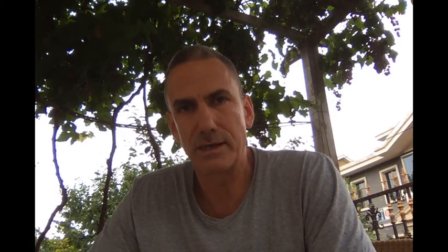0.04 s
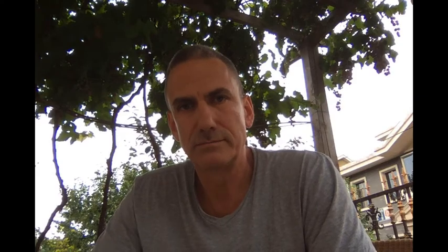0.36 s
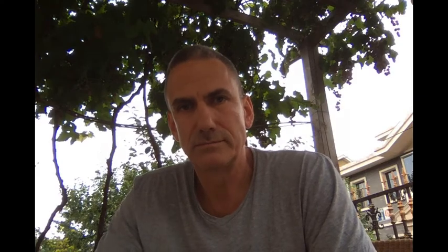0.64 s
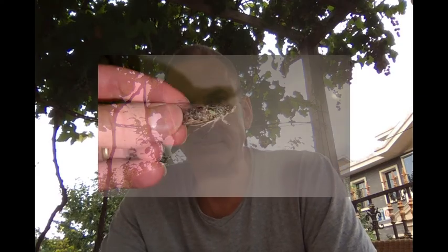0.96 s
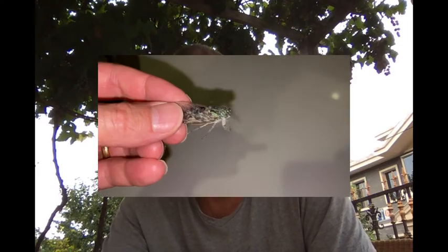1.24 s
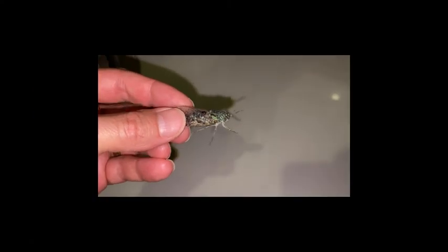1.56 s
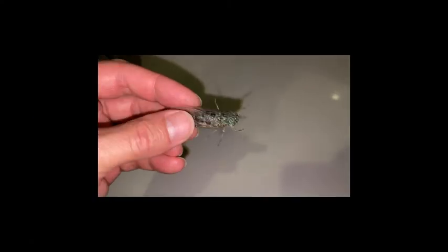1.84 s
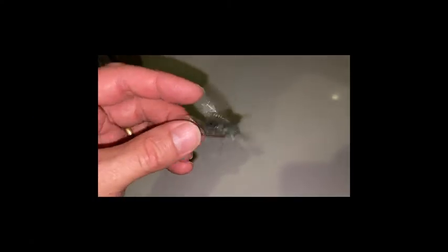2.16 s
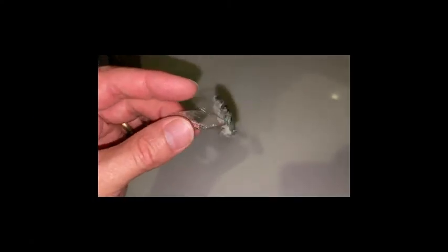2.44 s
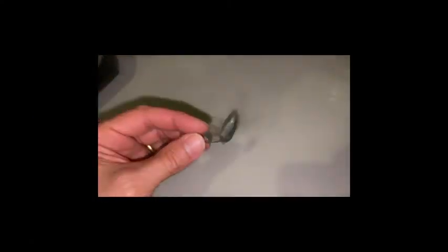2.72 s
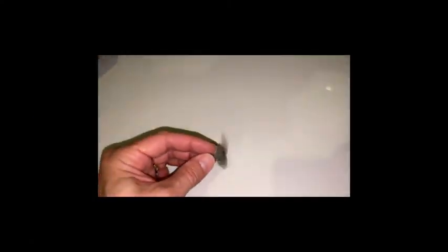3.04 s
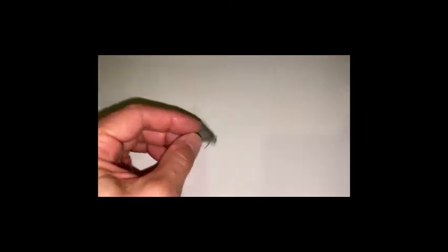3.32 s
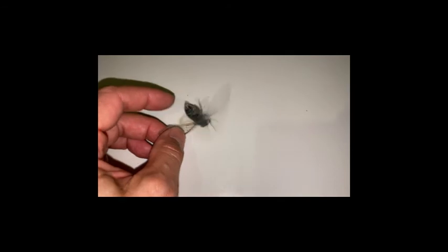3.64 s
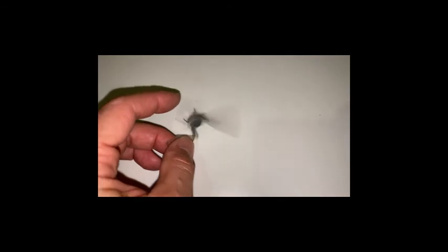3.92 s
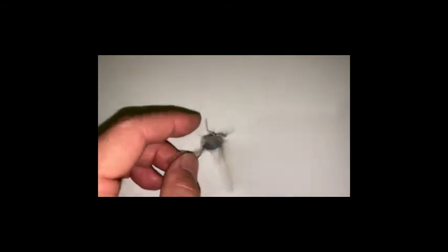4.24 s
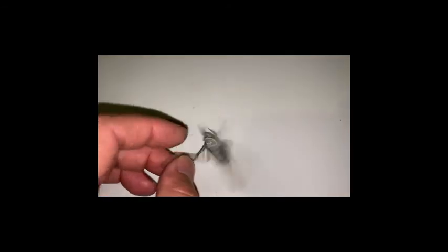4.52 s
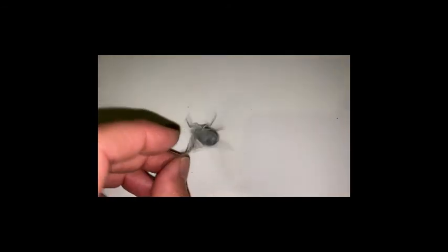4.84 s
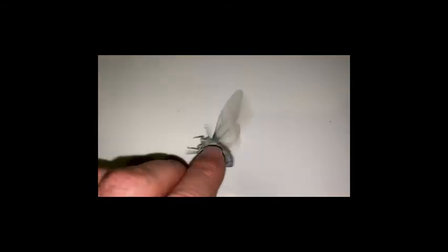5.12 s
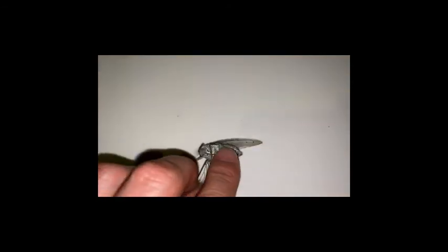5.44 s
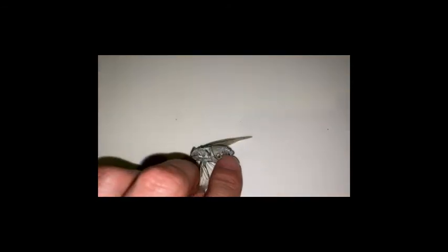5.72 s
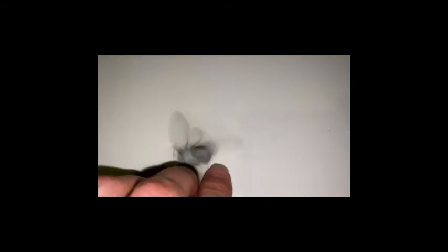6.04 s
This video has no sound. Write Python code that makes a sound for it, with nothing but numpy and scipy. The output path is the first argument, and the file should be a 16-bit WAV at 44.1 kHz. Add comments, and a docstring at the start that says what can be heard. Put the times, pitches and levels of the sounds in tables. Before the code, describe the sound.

A hand-held cicada buzzes in harsh, stuttering bursts with papery wing flicks, close up in a small room after a brief outdoor rumble.

```python
"""A cicada held between the fingers protests in harsh bursts, close up in a small, hard room.
Each pull of a tymbal buckles a row of ribs: they click, the thin membrane sizzles and the hollow
abdomen rings with a falling tone. The voice shifts as the insect is squeezed or twists away.
Wings and legs tick against the fingers, and the hands bump softly. Underneath, a low outdoor
rumble gives way to the room's air and hum after the first second."""
import sys
import numpy as np
from scipy import signal
from scipy.fft import rfft, irfft
from scipy.io import wavfile
from scipy.ndimage import uniform_filter1d

SR = 44100
rng = np.random.default_rng(int(sys.argv[2]) if len(sys.argv) > 2 else 0)


def int16_out(signal):
    """Quantize to a 16-bit WAV file."""
    q = np.round(np.clip(np.atleast_2d(signal).T, -1, 1) * 32767)
    wavfile.write(sys.argv[1], SR, q.astype(np.int16))


N = 267775
TIME = np.arange(N) / SR
PULSE_SIZE = 1024  # samples in one short sound
PULSE_TIME = np.arange(PULSE_SIZE) / SR


# The cicada's phrasing. Each row: first and last pull in seconds, pull period in ms, then the
# levels in dB at full effort of abdomen tone, rib clicks and membrane sizzle.
BURSTS = [(.952, 1.027, 8.7, -26, -22.5, -19.5), (1.043, 1.043, 8.5, -24.5, -25.5, -24),
          (1.416, 1.416, 8.5, -26, -21.5, -24.5), (1.649, 1.649, 8.5, -26, -21, -21.5),
          (1.994, 2.017, 12, -27.5, -21, -24), (2.265, 2.350, 8.55, -28.5, -21.5, -25.5),
          (2.369, 2.369, 8.5, -31, -22, -33), (2.408, 2.525, 8.65, -30.5, -21.5, -28),
          (2.550, 2.629, 7.9, -34.5, -21, -28.5), (2.642, 2.762, 8.7, -33, -22, -29.5),
          (2.769, 2.927, 7.9, -33.5, -25, -28.5), (2.935, 3.011, 7.7, -32.5, -22, -25.5),
          (3.048, 3.089, 7.8, -31, -22.5, -26.5), (3.118, 3.136, 7.5, -29.5, -22.5, -34),
          (3.512, 3.523, 11, -30, -23, -34), (3.588, 3.681, 8.3, -29, -20.5, -27.5),
          (3.840, 3.850, 10, -27.5, -21.5, -29.5), (3.987, 4.039, 8.8, -25.5, -20, -25.5),
          (4.211, 4.224, 13, -25, -18.5, -25), (4.297, 4.385, 8.5, -25.5, -19.5, -24.5),
          (4.455, 4.463, 8, -26, -19, -25), (4.641, 4.655, 14, -25.5, -21, -33.5),
          (4.9305, 4.9305, 8.5, -23.5, -17.5, -29.5), (5.038, 5.058, 9, -22.5, -16.5, -24.5),
          (5.231, 5.326, 8.6, -25, -24, -25.5), (5.335, 5.426, 9.15, -23.5, -21, -24.5),
          (5.438, 5.450, 12, -23, -18.5, -25), (5.618, 5.648, 9, -25, -22.5, -24),
          (5.662, 5.760, 7.9, -24, -20.5, -23), (5.807, 5.825, 9, -25.5, -22, -20),
          (5.887, 5.908, 8, -27.5, -22.5, -21)]

def pulls():
    """The muscles fire evenly through a burst, the last pull off the beat: times and three levels."""
    rows = []
    for first, last, period_ms, *levels in BURSTS:
        period = period_ms / 1000
        steady = np.arange(first, last - .75 * period, period)
        rows += [(s, *levels) for s in (*steady, last)]
    return np.transpose(rows)


# The body's EQ: one this small hardly radiates bass. Each row: frequency in Hz, gain in dB.
RADIATION = [(100, -33), (500, -9.5), (800, -7), (1000, 2), (1170, 11), (1350, 0), (1700, -2), (2200, 7),
             (2700, -1), (16000, -1)]

def tymbals(jitter_s=.0003, lead_s=.006, stroke_s=.0026, cup_s=2.66, cup_length_s=.055):
    """One pulse per pull: the ribs buckle in turn, ever more slowly, one to each swing of the abdomen."""
    times, tone_db, rib_db, sizzle_db = pulls()
    count = len(times)
    fresh, slack = effort(times)
    turn, (tone_hz, fall, rib_hz, sizzle_hz, sizzle_ms) = grip(times)
    cup = bell(times, cup_s, cup_length_s)  # a finger cups the abdomen and muffles its tone
    alternate_db = (-1) ** np.arange(count)  # the two tymbals take turns and are not quite alike
    # A run starts duller and a little sharp, and ends weaker and flat.
    tone_hz = tone_hz + 35 * fresh - 45.2 * slack
    tone_db = tone_db - 2.5 * slack - 6.5 * cup + alternate_db + scatter(1.6, count)
    rib_db = rib_db - 3.5 * fresh - 2.5 * slack - 7 * turn + scatter(1.6, count)
    sizzle_db = sizzle_db - 4.5 * fresh - 2.5 * slack + 2.2 * turn - alternate_db + scatter(2, count)

    # The stroke runs from -1 to 1 while the tymbal caves in.
    stroke = (PULSE_TIME - lead_s) / (stroke_s * np.exp(scatter(.1, count)))[:, None]
    force = np.clip(1 - stroke ** 2, 0, 1)
    swing, cycles = abdomen(stroke, tone_hz, fall)
    buckles = np.diff(np.floor(cycles), prepend=0, axis=1) * force * undb(scatter(3, force.shape))
    clicks = ribs(buckles, times, rib_hz, sizzle_ms / 1000, cup)
    sizzle = membrane(buckles, sizzle_hz, sizzle_ms / 1000, turn)
    pulses = at_level(np.sqrt(force) * swing, tone_db)
    pulses = pulses + at_level(clicks, rib_db) + at_level(sizzle, sizzle_db)
    return colour(place(times + scatter(jitter_s, count) - lead_s, pulses), RADIATION)


def effort(times, pause_s=.022, attack_s=.035, release_s=.022):
    """Effort builds through a run of pulls and slackens at its end: freshness and slack, both 0-1."""
    runs = np.split(times, np.flatnonzero(np.diff(times) > pause_s) + 1)
    fresh = np.concatenate([np.exp((run[0] - run) / attack_s) for run in runs])
    ending = np.concatenate([np.exp((run - run[-1]) / release_s) for run in runs])
    return fresh, ending * (1 - fresh)


# The voice in three holds. Each lists: abdomen pitch in Hz, its fall over half a stroke in nepers,
# rib centre in Hz, sizzle centre in Hz, sizzle decay in ms.
LOOSE = (1575, .15, 3820, 10100, 1)
SQUEEZED = (1755, .07, 5350, 9700, .7)
TURNED = (1480, .17, 4300, 11600, 12.6)
# Finger pressure. Each row: time in seconds, squeeze from 0 to 1.
SQUEEZE = [(2.28, 1), (2.4, 0.27), (2.52, 0.28), (2.58, .95), (2.69, 0.01), (3.7, .05), (4.05, .35),
           (4.33, 0), (4.46, .3), (5.28, 0.13), (5.35, .6), (5.9, 0.44)]
# The insect twisting away. Each row: time in seconds, turn from 0 to 1.
TURN = [(2.52, 0), (2.7, .5), (2.8, 1), (3.0, 0.92), (3.08, 0.14), (3.5, 0)]

def grip(times):
    """The hold morphs the voice from loose to squeezed, then to turned: each pull's turn and voice."""
    squeeze, turn = (curve(control, times)[0] for control in (SQUEEZE, TURN))
    facing = np.outer(LOOSE, 1 - squeeze) + np.outer(SQUEEZED, squeeze)
    return turn, facing * (1 - turn) + np.outer(TURNED, turn)


def abdomen(stroke, pitch_hz, fall, detune=.02, overtone_db=-12):
    """The hollow abdomen rings, falling in pitch through each stroke: its swing and phase in cycles."""
    pitch_hz = pitch_hz * np.exp(scatter(detune, len(stroke)))
    hz = pitch_hz[:, None] * np.exp(-fall[:, None] * stroke.clip(-1, 1))
    cycles = np.cumsum(hz, axis=1) / SR + rng.random((len(stroke), 1))
    return np.cos(2 * np.pi * cycles) + undb(overtone_db) * np.cos(4 * np.pi * cycles), cycles


# The bite of the rib clicks. Each row: frequency in Hz, gain in dB.
RIB_COLOUR = [(500, -50), (1500, -3), (2250, -12.5), (2700, 3), (3050, 1), (3500, -6), (4100, -7),
              (4900, -0.5), (5350, -4.5), (5800, -2.5), (6250, -5), (6650, -1.5), (7500, -12), (11000, -67)]
# The hollow between the fingers. Each row: time in seconds, resonance in Hz, boost in dB.
FINGER_HOLLOW = [(2.32, 4860, 5), (2.47, 2800, -1), (2.56, 2400, -6), (2.62, 3500, 3), (2.72, 4020, 6),
                 (2.9, 3950, 9), (3.0, 2830, 4.5), (5.3, 2660, 3.5), (5.34, 5330, 3.5), (5.9, 5900, 2)]

def ribs(buckles, times, centre_hz, sizzle_s, cup, snap_s=.0002, cup_db=16.5):
    """Ribs snap and ring the hollow between the fingers, strongly when a finger cups the abdomen."""
    # Turned away, the sizzle lengthens and the clicks smear into each other.
    snaps = crackle(buckles, snap_s + .36 * sizzle_s, side=.22)
    centre_hz = centre_hz * np.exp(scatter(.043, len(buckles)))
    hollow_hz, hollow_db = curve(FINGER_HOLLOW, times)
    return resonate(snaps, RIB_COLOUR, centre_hz, hollow_hz, hollow_db + cup_db * cup, width_hz=600)


# The membrane's bright sheen. Each row: frequency in Hz, gain in dB.
MEMBRANE_COLOUR = [(4000, -62), (7500, -3), (8600, 1.5), (9600, -3), (10800, -0.5), (12000, -3),
                   (13500, -6), (15700, -8.5), (18000, -58)]

def membrane(buckles, centre_hz, decay_s, turn):
    """The thin membrane sizzles and rings at a new pitch each pull; turned away, the ring stands out."""
    ring_hz = .96 * centre_hz * np.exp(scatter(.058, len(buckles)))
    ring_db = 9 + 5 * turn + scatter(3, len(buckles))
    shiver = crackle(buckles, decay_s, side=.45)
    return resonate(shiver, MEMBRANE_COLOUR, centre_hz, ring_hz, ring_db, width_hz=240)


def crackle(buckles, decay_s, side, tail_db=-19, tail_s=.004):
    """Each buckling rib leaves a brief crackle and a faint tail, a little different left and right."""
    fade = np.exp(-PULSE_TIME / decay_s[:, None]) + undb(tail_db) * np.exp(-PULSE_TIME / tail_s)
    envelope = signal.fftconvolve(buckles, fade, axes=1)[:, :PULSE_SIZE]
    return envelope * stereo_noise(side, buckles.shape)


def resonate(clicks, spectrum, centre_hz, mode_hz, mode_db, width_hz):
    """Ring each pulse through a spectrum tilted towards its centre, with one moving resonance."""
    hz = np.fft.rfftfreq(PULSE_SIZE, 1 / SR)
    gain = undb(across(spectrum, PULSE_SIZE))
    pitch = np.log(hz.clip(spectrum[0][0], spectrum[-1][0]))
    mean = np.average(pitch, weights=gain ** 2)
    spread = np.average((pitch - mean) ** 2, weights=gain ** 2)
    tilt = (np.log(centre_hz)[:, None] - mean) / (2 * spread)
    mode = 1 + (undb(mode_db)[:, None] - 1) / (1 + 2j * (hz - mode_hz[:, None]) / width_hz)
    return irfft(rfft(clicks) * gain * np.exp(tilt * (pitch - mean)) * mode)


# Bouts of wing flutter. Each row: start and end of the hold in seconds, level in dB before EQ.
FLUTTERS = [(1.84, 2.2, -58), (2.248, 3.12, -42), (3.57, 3.677, -41.5), (3.8, 4.25, -54),
            (4.68, 4.83, -47.5), (5.76, 5.86, -47)]

def flutter(attack_s=.045, release_s=.11):
    """Strength of the wing flutter: each bout swells, holds and dies away."""
    return sum(undb(db) * np.exp(np.minimum((TIME - start) / attack_s, (end - TIME) / release_s).clip(max=0))
               for start, end, db in FLUTTERS)


# The sharpest wing flicks. Each row: start in seconds, level in dB before EQ.
FLICKS = [(1.629, -43), (1.961, -43), (3.577, -31), (3.785, -25.5), (3.954, -44), (4.266, -27.5),
          (4.572, -38), (4.593, -37), (4.611, -25), (4.845, -38), (4.9985, -26.5), (5.842, -28)]
# The wings' papery EQ. Each row: frequency in Hz, gain in dB.
WING_COLOUR = [(200, -24), (900, -8.5), (2000, -4), (3500, -2), (6000, -2), (9000, -2), (12000, -5),
               (16000, -2.5)]

def wings(flick_s=.0014, touches_per_s=500, grain_s=.002, beat_hz=42, beat_db=5, fidget_db=-60):
    """Dry wings flick against the fingers over a fine crackle that swells with each beat."""
    starts, db = np.transpose(FLICKS)
    snaps = rng.standard_normal((len(starts), PULSE_SIZE)) * np.exp(-PULSE_TIME / flick_s)
    flicks = place(starts, at_level(snaps, db))
    touches = (rng.random(N) < touches_per_s / SR) * undb(scatter(6, N))
    grains = signal.fftconvolve(touches, np.exp(-PULSE_TIME / grain_s))[:N] * rng.standard_normal(N)
    beats = undb(beat_db * np.sin(2 * np.pi * beat_hz * TIME))
    fidget = undb(fidget_db) * np.clip(TIME / 1.7, 0, 1) ** 2  # legs and wings stir between bouts
    return colour(flicks + (flutter() + fidget) * unit(grains * beats), WING_COLOUR)


# Soft handling bumps. Each row: peak time in seconds, level in dB, half-width in seconds.
BUMPS = [(1.12, -46, 0.025), (2.19, -56, 0.06), (2.271, -48, 0.0082), (2.309, -44.5, 0.012),
         (2.42, -57, .03), (3.637, -54, 0.035), (4.601, -61, .04), (5.296, -58, 0.086),
         (5.81, -57.5, 0.063)]
# Their dull thud. Each row: frequency in Hz, gain in dB.
BUMP_COLOUR = [(30, -31), (90, 0), (160, -9), (300, -12), (700, -13.5), (1500, -29)]

def hands(shudder_db=-20):
    """Dull bumps as the grip shifts, and a low shudder while the wings flutter."""
    bumps = sum(undb(db) * bell(TIME, s, width) for s, db, width in BUMPS)
    return (bumps + undb(shudder_db) * flutter()) * unit(colour(stereo_noise(.1), BUMP_COLOUR))


# The insect's stereo balance. Each row: frequency in Hz, left minus right in dB.
PORT_BALANCE = [(700, 6.5), (1300, -1), (1900, 0), (2600, -5), (3500, -3.5), (5000, -1), (8000, 0.5),
                (15000, -0.5)]
# Its stereo phase. Each row: frequency in Hz, lead of the left side in radians.
PORT_PHASE = [(1000, 0.39), (2100, 0.012), (3500, 1.51), (4100, 1.92), (5000, 2), (6600, 1.83),
              (7300, 0.86), (10800, 1.04), (15000, 0.2)]

def ports(x):
    """The near sound reaches two microphone ports with unlike level and phase."""
    half = undb(across(PORT_BALANCE, N) / 2) * np.exp(.5j * across(PORT_PHASE, N))
    return irfft(rfft(x) * np.array([half, 1 / half]), N)


# The reverb's EQ. Each row: frequency in Hz, gain in dB.
ROOM_COLOUR = [(300, -4), (1200, -2.5), (1750, 2), (2300, 0.5), (2800, -0.5), (4000, 0.5), (4850, 2.5),
               (5600, -0.5), (8000, -0.5), (11000, -3.5), (16000, -2)]

def room(x, t60_s=.51, tail_db=-11, early_db=-12, early_s=.0071, gap_s=.0027):
    """Quick reflections from the near wall and table, then the room's tail, narrower in the lows."""
    t = np.arange(SR) / SR
    # Stereo width. Each row: frequency in Hz, side minus mid in dB.
    width = [(300, -7), (1400, -15.5), (2200, -3.5), (3500, 0), (7000, 0), (9000, -25), (16000, -12)]
    mid, side = rng.standard_normal((2, SR))
    side = colour(side, width)
    early = (t > gap_s) * np.exp(-t / early_s)
    tail = (t > gap_s) * undb(-60 * t / t60_s)
    decay = undb(early_db) * early / np.linalg.norm(early) + undb(tail_db) * tail / np.linalg.norm(tail)
    response = colour(np.array([mid + side, mid - side]) * decay / np.sqrt(2), ROOM_COLOUR)
    return signal.fftconvolve(x[None], response[:, :SR * 3 // 4], axes=1)[:, :N]


# The outdoor bed. Each row: frequency in Hz, gain in dB.
RUMBLE_COLOUR = [(15, -48), (25, -26), (60, 0), (158, -2.5), (394, -18), (475, -25.5), (749, -25.5),
                 (811, -24.5), (1630, -28.5), (3180, -31.5), (7090, -44), (9020, -45), (15000, -53)]

def outdoors(until_s, rumble_db=-46, hoot_s=.736, hoot_hz=740, hoot_db=-55, fade_s=.016):
    """Low outdoor rumble with one faint, far-off hoot, ending in a quick fade."""
    rumble = undb(rumble_db + 2.2 * waver(13.7)) * unit(colour(stereo_noise(.04), RUMBLE_COLOUR))
    hoot = undb(hoot_db) * bell(TIME, hoot_s, .025) * np.sin(2 * np.pi * hoot_hz * TIME)
    return np.clip((until_s - TIME) / fade_s, 0, 1) * (rumble + hoot)


# The room tone. Each row: frequency in Hz, gain in dB.
AIR_COLOUR = [(25, -38.5), (50, -5), (100, -6.5), (230, -9), (400, -14), (800, -16.5), (2000, -21),
              (5000, -21), (15000, -46)]
# The appliance's hum. Each row: pitch in Hz, level in dB before the fader.
HUM = [(48.4, -64), (231.5, -69), (452.2, -79)]
# A fader ride that dips air and hum together. Each row: time in seconds, gain in dB.
INDOOR_FADER = [(3.65, .5), (3.9, -6), (4.3, -4), (4.8, -.5), (5.55, -3), (5.8, -1)]

def indoors(fade_in_s, air_db=-60.5):
    """Quiet room air and an appliance's wavering hum fade in and stay."""
    mid, side = (unit(colour(noise, AIR_COLOUR)) for noise in rng.standard_normal((2, N)))
    side = colour(side, [(60, -26), (130, -14), (260, -5.5), (1000, 1)])  # the bass is nearly mono
    air = undb(air_db + 2.8 * waver(6)) * np.array([mid + side, mid - side])
    hum = sum(np.sqrt(2) * undb(db + 3.7 * waver(9)) * np.sin(2 * np.pi * hz * TIME + 1.2 * waver(14))
              for hz, db in HUM)
    fade_in = np.clip(TIME / fade_in_s, 0, 1) ** 4
    return fade_in * (air + hum) * undb(curve(INDOOR_FADER, TIME)[0])


def undb(db):
    """Decibels to gain."""
    return 10 ** (np.asarray(db) / 20)


def unit(x):
    """Scale to rms 1."""
    return x / np.sqrt(np.mean(x ** 2))


def bell(t, centre, width):
    """A smooth swell that peaks at 1."""
    return np.exp(-((t - centre) / width) ** 2)


def scatter(spread, shape):
    """Random offsets around zero."""
    return spread * rng.standard_normal(shape)


def waver(rate_hz):
    """A slow random drift with a spread near 1."""
    step = int(SR / rate_hz)
    held = np.repeat(rng.standard_normal(N // step + 1), step)
    return 1.3 * uniform_filter1d(uniform_filter1d(held, step), step)[:N]


def stereo_noise(side, shape=(N,)):
    """Noise shared by both channels, with a share that differs."""
    mid, diff = rng.standard_normal((2, *shape))
    return np.array([mid + side * diff, mid - side * diff])


def curve(table, times):
    """The columns of a table at the given times."""
    seconds, *columns = np.transpose(table)
    return [np.interp(times, seconds, column) for column in columns]


def across(points, size):
    """(Hz, value) points joined on a log axis, at the bins of a transform."""
    hz, value = np.transpose(points)
    return np.interp(np.log(np.fft.rfftfreq(size, 1 / SR) + 1), np.log(hz), value)


def colour(x, points):
    """Filter by a (Hz, dB) spectrum."""
    size = x.shape[-1]
    return irfft(rfft(x) * undb(across(points, size)), size)


def at_level(sounds, db, period_s=.0085):
    """Give each short sound its level, taken over one tymbal period."""
    return sounds * (undb(db) * np.sqrt(period_s * SR / np.sum(sounds ** 2, axis=-1)))[..., None]


def place(times, sounds):
    """Lay short sounds (events x samples, mono or per channel) along the timeline."""
    track = np.zeros(sounds.shape[:-2] + (N + PULSE_SIZE,))
    for k, s in enumerate(times):
        start = int(np.clip(s * SR, 0, N))
        track[..., start:start + PULSE_SIZE] += sounds[..., k, :]
    return track[..., :N]


def scene(handover_s=1.18):
    """The cicada and its reverb, the hands, and an outdoor bed that hands over to room tone."""
    cicada = tymbals() + wings()
    foreground = ports(cicada) + room(cicada.mean(axis=0)) + hands()
    return foreground + outdoors(handover_s) + indoors(handover_s)


def record(dry, ceiling=.75, top_hz=16000):
    """A soft limiter rounds the highest peaks and a steep low-pass cuts the top."""
    rounded = dry / (1 + (dry / ceiling) ** 6) ** (1 / 6)
    return signal.sosfilt(signal.ellip(10, .2, 70, top_hz, fs=SR, output="sos"), rounded)


dry = scene()
out = record(dry)
int16_out(out)
```